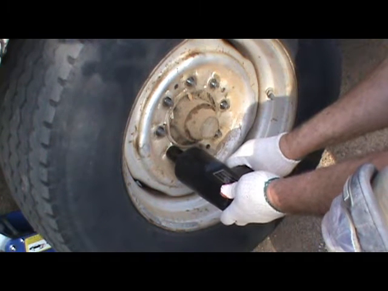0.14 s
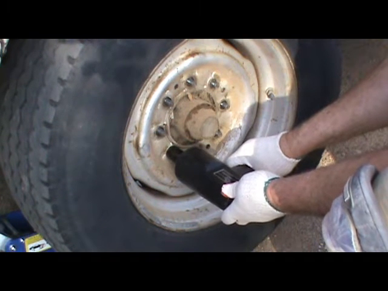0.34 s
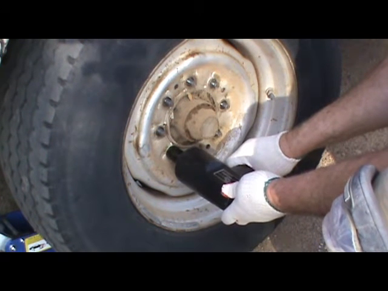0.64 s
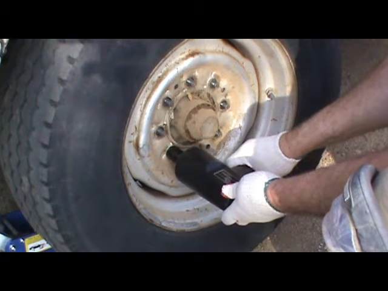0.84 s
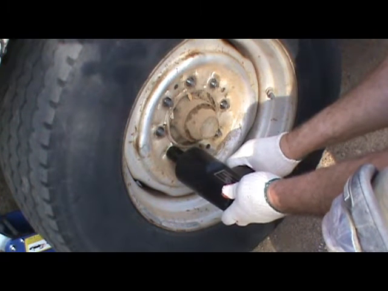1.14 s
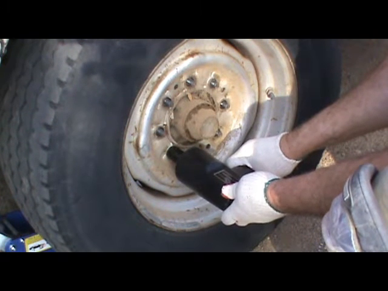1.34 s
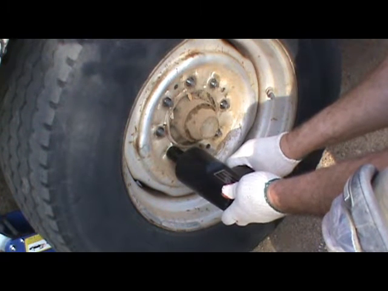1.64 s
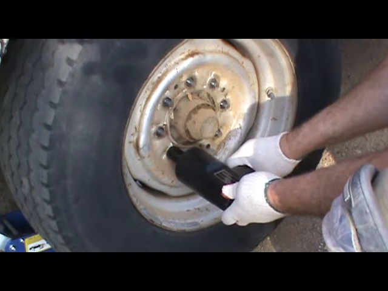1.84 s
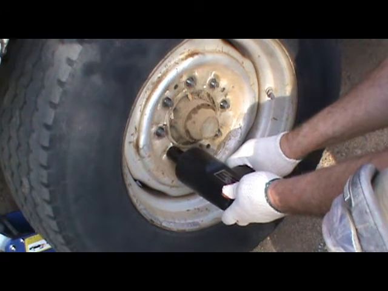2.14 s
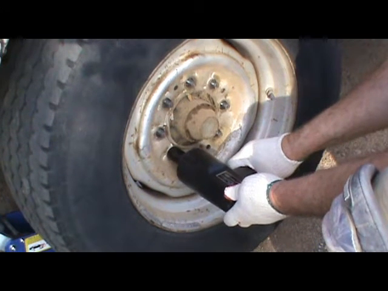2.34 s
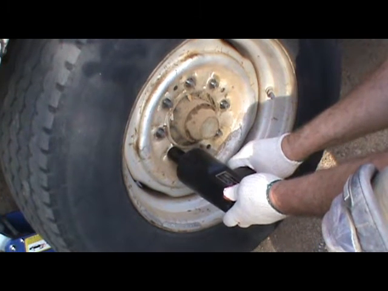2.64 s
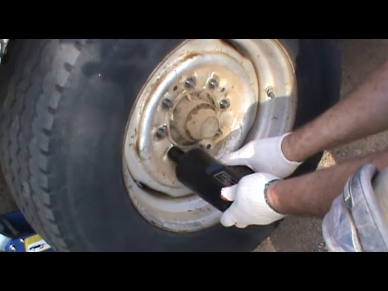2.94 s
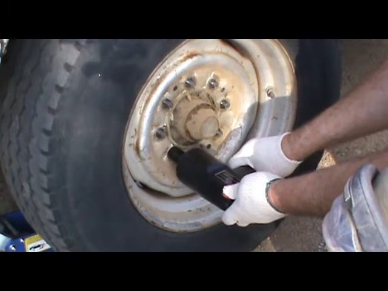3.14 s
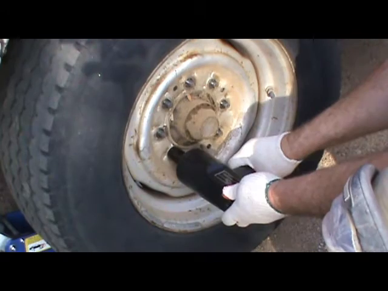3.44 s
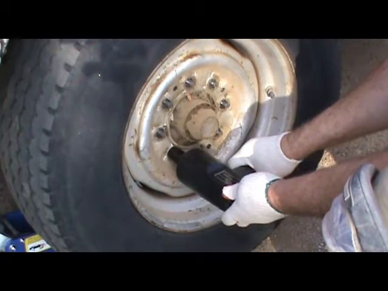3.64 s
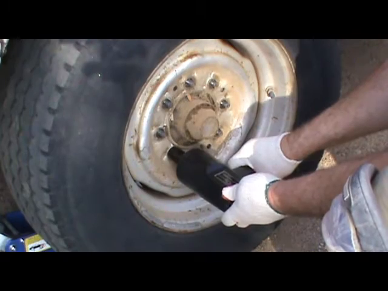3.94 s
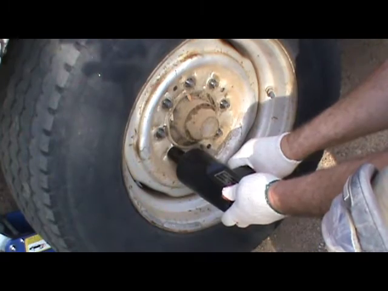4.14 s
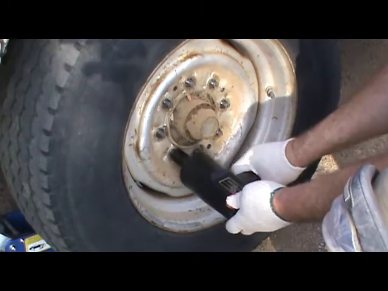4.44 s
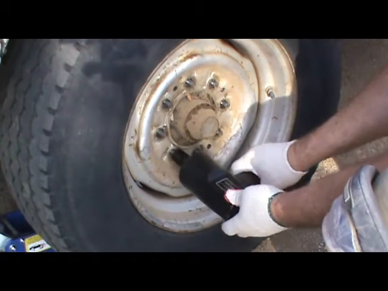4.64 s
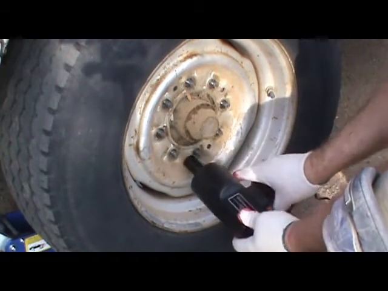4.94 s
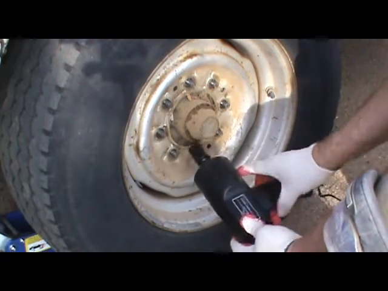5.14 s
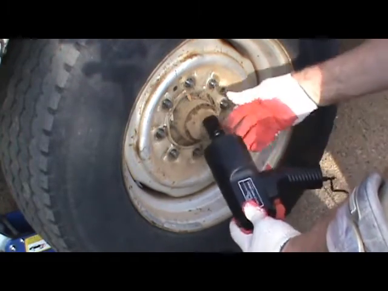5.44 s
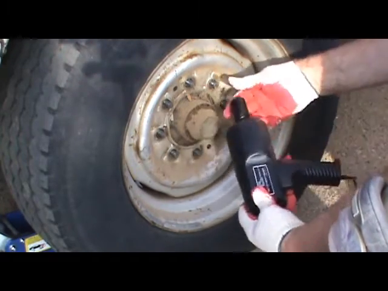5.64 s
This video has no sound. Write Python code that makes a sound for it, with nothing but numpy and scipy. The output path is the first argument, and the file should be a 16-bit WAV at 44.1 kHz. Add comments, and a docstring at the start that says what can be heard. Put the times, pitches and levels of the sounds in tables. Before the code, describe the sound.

A heavy motorised wrench works on a truck wheel nut in open air, heard close in stereo. Three accelerating, rattling whines each end abruptly in a sharp steel crack with wheel ringing. A short pause after the second leaves only fading ring, a low tyre hum, and two clicks. After the third, the motor keeps running, a bright scrape and squeak follow, and loose knocking slows with the tool in the air.

```python
"""A motor already spinning up is heard first, gears whining and clutch rattling: an electric flywheel impact wrench
on a lug nut of a steel truck wheel, close by and outdoors. Three spin-ups end in hammer blows that ring the wheel.
After the second the tool rests and clicks twice; the third frees the nut and the wrench is drawn off, running down.
Impacts excite decaying modes; the rattle is contact noise, and the whine gear-mesh harmonics, both following
the flywheel's speed through the resonances of the housing."""
import sys
import numpy as np
from scipy import signal
from scipy.fft import rfft, irfft
from scipy.io import wavfile
from scipy.ndimage import uniform_filter1d

SR = 44100
rng = np.random.default_rng(int(sys.argv[2]) if len(sys.argv) > 2 else 0)


def inscribe(sig):
    """Save sig as 16-bit PCM at rate SR to the path in sys.argv[1].

    A 1-D sig is mono; a 2-D sig holds one channel per row.
    Samples are clipped to [-1, 1] before scaling.
    """
    pcm = np.round(np.clip(np.atleast_2d(sig).T, -1, 1) * 32767)
    wavfile.write(sys.argv[1], SR, pcm.astype(np.int16))


N = 255780
T = np.arange(N) / SR   # time [s]
HZ = np.maximum(np.arange(N // 2 + 1) * SR / N, 1)   # frequency of each spectral bin [Hz]


def from_db(db):
    """Level: 20 dB is a factor of ten in amplitude."""
    return 10 ** (np.asarray(db) / 20)


def rms_one(x):
    """Normalization: scales a signal to unit root mean square."""
    return x / np.sqrt(np.mean(x ** 2) + 1e-20)


def in_time(rows):
    """Linear interpolation: each column of a curve at every sample."""
    s, *columns = np.transpose(rows)
    return [np.interp(T, s, c) for c in columns]


def over_hz(points):
    """Logarithmic frequency scale: a table interpolated at every bin."""
    hz, value = np.transpose(points)
    return np.interp(np.log(HZ), np.log(hz), value)


def body(slope, peaks=()):
    """Minimum phase: the causal response of a slope with resonances, found by cepstrum; power gain 1."""
    db = over_hz(slope)
    for hz, width, gain_db in peaks:
        db = db + gain_db / (1 + (2 * (HZ - hz) / width) ** 2)
    cepstrum = irfft(np.log(rms_one(from_db(db))), N)
    cepstrum[1:N // 2] *= 2
    cepstrum[N // 2 + 1:] = 0
    return np.exp(rfft(cepstrum))


def through(x, response):
    """Linear filtering: multiplies the spectrum by a response."""
    return irfft(rfft(x) * response, N)


def noise():
    """White noise: independent normal samples."""
    return rng.standard_normal(N)


def band(x, low_hz, high_hz):
    """Band limitation: a Butterworth bandpass."""
    edges = [low_hz, min(high_hz, SR / 2 - 1)]
    return signal.sosfilt(signal.butter(4, edges, "band", fs=SR, output="sos"), x)


def strike(s, t60, rise=.0004):
    """Exponential decay: climbs 20 dB per rise time up to 1 at time s, then falls 60 dB in t60."""
    climb_db = 20 * (T - s) / rise
    decay_db = -60 * (T - s) / t60
    return from_db(np.maximum(np.where(T < s, climb_db, decay_db), -200))


def tail(t60):
    """High modal density: many crowded modes dying away together as noise; power gain 1."""
    decay = noise() * strike(0.00095, t60)
    return rfft(decay) / np.linalg.norm(decay)


def hold(start_s, end_s, edge_s):
    """Gating: an envelope of 1 between two times, with sloping edges inside them."""
    return np.clip(np.minimum(T - start_s, end_s - T) / edge_s, 0, 1)


def linger(energy, t60, build_s=.001):
    """Energy storage: contacts build up and die away in the metal."""
    keep = from_db(-120 / (t60 * SR))   # energy falls by 10^6 in t60
    swell = np.exp(-1 / (build_s * SR))
    return signal.lfilter([1 - swell], [1, -keep - swell, keep * swell], energy + 1e-18)


def scattered(scatter_db):
    """Random excitation: a varying energy for each contact."""
    return from_db(scatter_db * np.clip(noise(), -2, 2)) ** 2


def per_turn(turns, count, scatter_db):
    """Cyclic excitation: contacts come count times a turn, each a little early or late."""
    wobble = rms_one(uniform_filter1d(noise(), size=1500))
    step = np.maximum.accumulate(np.floor(count * (turns + .025 * wobble)))
    return np.diff(step, prepend=step[0]) * scattered(scatter_db)


def loose_parts(per_s, scatter_db):
    """Shot process: contacts come at random."""
    return (rng.random(N) < per_s / SR) * scattered(scatter_db)


# Spectrum of the outdoor air: (frequency [Hz], relative level [dB])
OUTDOOR_SPECTRUM = [(15, -37), (25, -7), (144, -9.5), (209, -2.5), (445, -18), (537, -10), (1300, -18.5),
                    (1660, -21), (1850, -25), (3260, -24.5), (14300, -34.5), (15500, -41)]


def outdoors():
    """Ambient noise: steady noise of fixed spectrum."""
    return from_db(-50.0) * through(noise(), body(OUTDOOR_SPECTRUM))


def breeze():
    """Incoherent noise: each port has its own low rumble."""
    return from_db(-72) * np.array([rms_one(band(noise(), 22, 120)) for port in "LR"])


# Low thumps and buffets; at 2.3 s the tyre and truck thump after the blow:
# (peak time [s], level [dB], 20 dB rise time [s], t60 [s], upper edge [Hz])
LOW_THUMPS = [(1.06, -33.5, 0.022, 0.9, 315), (1.45, -26, 0.072, 0.76, 112), (2.3, -17.5, 0.018, 0.46, 890),
              (2.45, -33.5, 0.075, 1, 487), (4.4, -32, 0.29, 0.78, 273), (5.725, -21.5, 0.03, 0.28, 118)]
# Spectrum of the thumps and buffets before the upper edge: (frequency [Hz], relative level [dB])
THUMP_SPECTRUM = [(15, -49), (25, -21), (275, -4.5), (361, -4.5), (395, -12.5), (533, -12), (730, -15),
                  (786, -12.5), (900, -13), (1170, -49), (1980, -120)]


def thumps():
    """Low-frequency transients: band-limited noise rises and dies as thumps and buffets."""
    lumps = through(noise(), body(THUMP_SPECTRUM))
    out = 0
    for s, db, rise, t60, edge_hz in LOW_THUMPS:
        out = out + from_db(db) * strike(s, t60, rise) * band(lumps, 25, edge_hz)
    return out


TYRE_HZ, TYRE_DB = 201, -52.5   # frequency [Hz], rms level while held [dB]
TYRE_S, TYRE_HOLD_S, TYRE_T60_S = 2.28, .75, 1.7   # start, steady time and decay [s]


def tyre_hum():
    """Cavity resonance: the air in the tyre, set humming by the second blow, holds and then decays."""
    fade_in = np.clip((T - TYRE_S) / .04, 0, 1)
    level_db = TYRE_DB - 60 * np.maximum(T - TYRE_S - TYRE_HOLD_S, 0) / TYRE_T60_S
    return fade_in * from_db(level_db) * np.sqrt(2) * np.sin(2 * np.pi * TYRE_HZ * T)


# Clutch and trigger contacts, in two groups: (time [s], level [dB], t60 [s])
LATCH_CONTACTS = [(2.826, -32.5, 0.039), (2.8472, -28.5, 0.12), (2.852, -18, 0.022), (2.992, -27.5, 0.12),
                  (2.9947, -14.5, 0.025)]
# Spectrum of a contact: (frequency [Hz], relative level [dB])
LATCH_SPECTRUM = [(88, -33), (150, -16), (314, -5.5), (404, -3), (1200, -3.5), (1340, -0.5), (1830, -3.5),
                  (3830, -6), (4140, -11), (4930, -3.5), (6470, -14), (10900, -9.5), (15500, -42)]


def latch():
    """Impulsive excitation: the clutch falling back and the trigger click and ring briefly in the case."""
    envelope = sum(from_db(db) * strike(s, t60, rise=0.0022) for s, db, t60 in LATCH_CONTACTS)
    return through(envelope * noise(), body(LATCH_SPECTRUM) * (1 + 0.21 * tail(t60=0.022)))


SCRAPE_FROM_S, SCRAPE_TO_S, SCRAPE_EDGE_S = 4.45, 4.77, 0.031   # start, end and fading edges [s]
SCRAPE_DB = -29.5   # level of the unit-rms grit inside the gate [dB]


def scrape():
    """Sliding friction: the socket leaves the nut in dense random contacts, bright and gritty."""
    grit = np.sqrt(linger(loose_parts(per_s=380, scatter_db=4.0), t60=.02)) * noise()
    gate = hold(SCRAPE_FROM_S, SCRAPE_TO_S, SCRAPE_EDGE_S)
    return from_db(SCRAPE_DB) * gate * rms_one(band(grit, 7600, 10400))


# Nut and socket squeals: (peak time [s], frequency [Hz], level [dB], 20 dB rise time [s], t60 [s])
SQUEAL_TONES = [(1.047, 8898, -19, .02, .11), (1.05, 4032, -26, .02, .16), (1.04, 5184, -31, .01, .18),
                (2.29, 8898, -27, .015, .14), (4.664, 5950, -14, .004, .03)]


def squeals():
    """Friction-induced vibration: steel slipping on steel gives short pure tones."""
    out = 0
    for s, hz, db, rise, t60 in SQUEAL_TONES:
        out = out + from_db(db) * strike(s, t60, rise) * np.sin(2 * np.pi * hz * T)
    return out


# Modes of the steel wheel: (frequency [Hz], t60 [s], relative level at the first blow [dB],
# relative level at the later blows [dB])
WHEEL_MODES = [(531, 1.2, -42, -32), (554, .3, -27, -36), (807, 1.2, -42, -38), (1066, 1.3, -44, -44),
               (1707, 1.8, -33, -45), (1814, .64, -37, -38), (2148, .6, -22, -38), (2272, .35, -23, -30),
               (2422, .75, -37, -31), (2616, 1.0, -47, -44), (2840, .5, -31, -45), (2902, .83, -45, -40),
               (3160, 1.4, -52, -44), (3198, .9, -41, -37), (3311, .75, -29, -38), (3892, 1.1, -41, -46),
               (4274, .7, -45, -41), (4689, .35, -23, -38), (5044, .65, -36, -36), (8053, .25, -42, -44)]


def ring(s, mix):
    """Modal superposition: decaying wheel modes, their levels mixed between first and later blows."""
    out, start = np.zeros(N), int(s * SR)
    age = T[:N - start]
    phases = rng.uniform(-np.pi, np.pi, len(WHEEL_MODES))
    for (hz, t60, first_db, later_db), phase in zip(WHEEL_MODES, phases):
        struck_db = np.interp(mix, [0, 1], [first_db, later_db])
        db = struck_db - np.minimum(60 * age / t60, 200)
        out[start:] += from_db(db) * np.sin(2 * np.pi * hz * age + phase)
    return out * np.clip((T - s) / 0.0027, 0, 1)   # soft onset


# Hammer blows, the first a double strike: (time [s], crack level [dB], crack t60 [s],
# wash level before its gain [dB], gain on the wheel modes [dB], mix of the mode levels [0 first, 1 later])
HAMMER_BLOWS = [(1.005, -9, 0.035, -60, -32, 0.15), (1.016, -14, 0.27, -30, 3, 0.26),
                (2.266, -10, 0.21, -31.5, -0.5, 0.88), (4.219, -10.5, 0.14, -33, -2, 0.89)]
# Spectrum of crack and wash: (frequency [Hz], relative level [dB])
CRACK_SPECTRUM = [(59, -37), (100, -15), (447, -7.5), (742, -4.5), (956, 4), (1230, -5), (2270, -2.5),
                  (2990, -7), (4560, -2), (6950, -12.5), (9150, -4), (10400, -9), (12000, -12),
                  (14200, -25), (15500, -30)]


def hammer():
    """Impact: each blow cracks, leaves a duller wash in the rim and excites the wheel modes."""
    crack = wash = rings = 0
    for s, crack_db, t60, wash_db, ring_db, mix in HAMMER_BLOWS:
        crack = crack + from_db(crack_db) * strike(s, t60)
        wash = wash + from_db(wash_db) * strike(s, t60=0.53)
        rings = rings + from_db(ring_db) * ring(s, mix)
    colour = body(CRACK_SPECTRUM)
    crack_sound = through(crack * noise(), colour)
    wash_sound = band(through(wash * noise(), colour), 300, 7400)
    return crack_sound + from_db(8.5) * wash_sound + rings


# Spin-ups of the motor: (motor start [s], hammer drops in [s])
SPIN_UPS = [(-.146, 1.003), (1.052, 2.262), (3.013, 4.213)]
# Flywheel speed once the nut has let go: (time [s], speed [turns/s])
LOOSE_SPEED = [(4.22, 45), (4.26, 45), (4.43, 40), (4.55, 43.3), (4.8, 44.7), (5.8, 30)]
NUT_LOOSE_S = LOOSE_SPEED[0][0]
TOP_SPEED, SPIN_UP_S = 74.4, .86   # limit of the speed [turns/s], time constant [s]
STALL_S = .007   # a blow stops the flywheel in this time [s]


def flywheel():
    """Rotational inertia: speed nears its limit exponentially, stalls at a blow, and runs on once the nut is loose."""
    speed = in_time(LOOSE_SPEED)[0] * np.clip((T - NUT_LOOSE_S) / STALL_S, 0, 1)
    for start_s, blow_s in SPIN_UPS:
        spin_up = 1 - np.exp(-np.maximum(T - start_s, 0) / SPIN_UP_S)
        speed = speed + TOP_SPEED * spin_up * hold(start_s, blow_s + STALL_S, STALL_S)
    return speed


WORKING_SPEED = 50   # reference for the levels [turns/s]
PICKUP_SPEED = 6   # slower than this the works hardly rattle [turns/s]


def with_speed(speed, doubling_db):
    """Power law: gain grows by so many dB per doubling of speed and vanishes at a crawl."""
    gain = from_db(doubling_db * np.log2(speed / WORKING_SPEED + 1e-9))
    return gain * speed ** 2 / (speed ** 2 + PICKUP_SPEED ** 2)


# Gear growl, clutch clatter and metal chatter, before the layer trims: (level at working speed [dB],
# rise on the nut [dB per doubling of speed], change with the nut loose [dB], change off the nut [dB])
RATTLE_LEVELS = [(-20.9, 2.6, -2, -.1), (-20, 6.4, -1.2, -.6), (-27.8, 7.9, -3.8, 1.9)]
# Dips and swells of the growl as the wrench is drawn off: (time [s], change [dB], half width to 1/e [s])
GROWL_SWELLS = [(4.6, -6, 0.033), (4.75, 2.4, .05), (5.19, 4, 0.036)]
FREE_FOLLOWS = .6   # off the nut the rattle's dB follow the speed by only this share


def running_levels(speed, seated):
    """Load dependence: growl, clatter and chatter shift balance with speed and load, brighter when fast."""
    loose = T > NUT_LOOSE_S
    follows = seated + FREE_FOLLOWS * (1 - seated)
    gains = []
    for db, doubling_db, loose_db, free_db in RATTLE_LEVELS:
        load_db = db + loose_db * loose + free_db * (1 - seated)
        gains.append(from_db(load_db) * with_speed(speed, doubling_db * follows))
    growl, clatter, chatter = gains
    swell_db = sum(db * np.exp(-((T - s) / width) ** 2) for s, db, width in GROWL_SWELLS)
    return growl * from_db(swell_db), clatter, chatter


def rattle(contacts, t60, turn_share, jaw_share, loose_share):
    """Amplitude-modulated noise: flywheel, jaw and loose-part bursts over steady rubbing; rms 1."""
    energy = 1   # the rubbing
    for hits, share in zip(contacts, (turn_share, jaw_share, loose_share)):
        ringing = linger(hits * scattered(2), t60)   # each contact varies anew in every layer
        energy = energy + share * ringing / ringing.mean()
    return rms_one(np.sqrt(energy) * noise())


def gears(turns, housing):
    """Gear mesh: 26 uneven teeth a turn give a harmonic whine, swelling as it crosses a resonance; rms 1."""
    mesh = 2 * np.pi * 26 * turns + .2 * rms_one(uniform_filter1d(noise(), size=700))
    tone = np.sin(mesh) + from_db(-2) * np.sin(2 * mesh) + from_db(-5) * np.sin(3 * mesh)
    once_a_turn = 1 + .35 * np.cos(2 * np.pi * turns)
    return rms_one(through(tone * once_a_turn, housing))


SING_HZ, SING_WIDTH_HZ = 2190, 42   # mode of the free socket: frequency and width [Hz]


def singing():
    """Narrow resonance: noise drives one mode of the free socket; rms 1."""
    return rms_one(through(noise(), 1 / (1 + 2j * (HZ - SING_HZ) / SING_WIDTH_HZ) ** 2))


# Individually timed knocks of the loose socket: (time [s], level before the layer gains [dB],
# treble against that level [dB])
TIMED_KNOCKS = [(0.3336, -7, -4), (0.367, -6.5, 3), (1.496, -13, 1), (3.3288, -9.5, 6), (3.5982, 0.5, -4),
                (4.3102, -1, -1), (4.3311, -1, 0), (4.354, 2, 0), (4.3778, -1, -1), (4.4257, 4, -11),
                (5.0753, 4, -11), (5.2829, 3.5, -11), (5.375, 2, 1.5), (5.492, 3, -1), (5.5902, -10, 13),
                (5.6121, 2, -7), (5.6546, -5, 9), (5.7192, -10, 10)]
STRAY_SEATED_CHANCE, STRAY_FREE_CHANCE = .2, .5   # stray knocks on the nut and off it [chance per turn]
# Strays at working speed, before the layer gains: level [dB], rise [dB per doubling], spread and treble [dB]
STRAY_DB, STRAY_DOUBLING_DB, STRAY_SPREAD_DB, STRAY_TREBLE_DB = -8.5, 1, 1.8, 3.5


def knocks(housing, turns, speed, seated):
    """Backlash: the socket knocks on its square drive, oftener when free, as a thud with a bright edge."""
    chance = STRAY_SEATED_CHANCE * seated + STRAY_FREE_CHANCE * (1 - seated)
    strays = per_turn(turns, count=1, scatter_db=STRAY_SPREAD_DB) * (rng.random(N) < chance)
    dull = strays * (from_db(STRAY_DB) * with_speed(speed, STRAY_DOUBLING_DB)) ** 2
    bright = dull * from_db(STRAY_TREBLE_DB) ** 2
    for s, db, treble_db in TIMED_KNOCKS:
        dull[int(s * SR)] = from_db(db) ** 2
        bright[int(s * SR)] = from_db(db + treble_db) ** 2
    thud = through(np.sqrt(linger(dull, t60=0.011)) * noise(), housing)
    edge = band(np.sqrt(linger(bright, t60=0.012)) * noise(), 3100, 10900)
    return from_db(-10.0) * thud + from_db(-12) * edge


# Socket on the nut: (time [s], share seated [0-1])
SOCKET_SEATING = [(4.52, 1), (4.8, 0.02)]
# Broad response of the wrench on the nut, and held free: (frequency [Hz], relative level [dB])
SEATED_SLOPE = [(100, -21), (200, -11.5), (350, -0.5), (800, 0.5), (1600, -5.5), (3000, 1), (5000, -7.5),
                (7000, -12.5), (11000, -2), (15300, -17)]
FREE_SLOPE = [(100, -27.5), (200, -22.5), (350, -7.5), (800, -5), (1600, -4), (3000, 5), (5000, 1),
              (7000, -10.5), (11000, -16), (15300, -25)]
# Resonances added to each: (frequency [Hz], width [Hz], height [dB])
SEATED_RESONANCES = [(423, 48, 4), (590, 125, 5.1), (991, 132, 11.2), (1109, 28, 11.5), (1291, 310, 8.6),
                     (1450, 208, 12.1), (1852, 270, 8.3), (2120, 300, 5), (2422, 410, 6.3), (2940, 66, 3.7),
                     (3400, 340, 4.2), (3890, 400, 4.3), (4360, 480, 7.5), (4730, 330, 8.1),
                     (5690, 730, 7.6), (7710, 1570, 9.3), (8910, 360, 7.1), (9400, 630, 7.6),
                     (11300, 751, 6.2), (12300, 380, 5.9), (13712, 287, 3.6)]
FREE_RESONANCES = [(420, 150, 2.7), (1040, 165, 13.2), (1330, 165, 8.6), (1820, 250, 6.1), (2156, 260, 7.9),
                   (2214, 36, 5.1), (2390, 540, 3.4), (3730, 430, 4.2), (4480, 570, 6.9), (5900, 390, 5.9),
                   (7560, 840, 4.3), (9100, 1200, 3.3), (10630, 650, 3.6)]


def wrench():
    """Source and filter: whine and rattle of the works, coloured by the housing and what it touches."""
    speed = flywheel()
    seated = np.clip(in_time(SOCKET_SEATING)[0], 0, 1)
    turns = np.cumsum(speed) / SR
    flywheel_hits = per_turn(turns, count=1, scatter_db=1.0)
    # the three jaws clatter most when unloaded
    jaw_hits = per_turn(turns, count=3, scatter_db=3.5) * (1 - 0.8 * seated)
    contacts = flywheel_hits, jaw_hits, loose_parts(per_s=520, scatter_db=0.5)
    growl, clatter, chatter = running_levels(speed, seated)

    crowded = 1 + tail(t60=.07) * np.interp(HZ, [1500, 6000], [.15, .35])
    on_nut = body(SEATED_SLOPE, SEATED_RESONANCES) * crowded
    in_air = body(FREE_SLOPE, FREE_RESONANCES) * crowded

    low = band(rattle(contacts, t60=0.025, turn_share=0.14, jaw_share=0.63, loose_share=2.2), 89, 1720)
    middle = band(rattle(contacts, t60=0.023, turn_share=0.58, jaw_share=1.25, loose_share=1.6), 1720, 6820)
    high = band(rattle(contacts, t60=0.032, turn_share=2.8, jaw_share=1.0, loose_share=1.7), 7140, 20300)
    layers = [(growl * from_db(0.15), low), (clatter * from_db(-.5), middle), (chatter * from_db(-0.6), high)]
    out = 0
    for gain, x in layers:
        nut_sound = np.sqrt(seated) * rms_one(through(x, on_nut))
        free_sound = np.sqrt(1 - seated) * rms_one(through(x, in_air))
        out = out + gain * (nut_sound + free_sound)

    whine_gain = growl * from_db(-5.5 - 8 * (1 - seated)) * np.minimum(speed / 44, 1)
    whine = whine_gain * gears(turns, on_nut)
    song = clatter * from_db(-8) * (1 - seated) * singing()
    return out + whine + song + knocks(in_air, turns, speed, seated)


# Phase lead of the left port over the right: (frequency [Hz], lead [rad])
LEFT_LEAD = [(60, .6), (200, .85), (430, 1.05), (1200, .9), (1800, .5), (2800, .25), (5500, .3),
             (7500, .03), (15000, 0)]
# Level of the left port over the right: (frequency [Hz], difference [dB])
LEFT_BALANCE = [(60, .5), (250, 2.4), (600, 2.1), (1300, 3), (2200, 1.7), (4400, .8), (15000, 0)]
# Wandering side signal: (frequency [Hz], gain [dB])
SIDE_GAIN = [(100, -19), (600, -17), (1300, -13.5), (4500, -12), (8000, -15), (13000, -33)]


def microphones(x, wandering):
    """Interaural differences: left hears first and louder; contacts at different spots move the image."""
    lean = from_db(over_hz(LEFT_BALANCE) / 2) * np.exp(.5j * over_hz(LEFT_LEAD))   # half to each port
    spot = rms_one(uniform_filter1d(noise(), size=300))
    side = through(wandering * spot, from_db(over_hz(SIDE_GAIN)))
    return np.array([through(x, lean) + side, through(x, 1 / lean) - side])


def scene():
    """Superposition: all sources add at the microphone pair, and the tool's image wanders."""
    tool = from_db(.5) * wrench() + hammer() + scrape() + latch()
    surroundings = squeals() + thumps() + tyre_hum() + outdoors()
    return microphones(tool + surroundings, tool) + breeze()


CUTOFF_HZ = 15700   # upper limit of the sound [Hz]


def record(dry):
    """Saturation and band limitation: peaks are rounded, then the top is cut."""
    top = 0.88
    rounded = top * np.tanh(dry / top)
    return signal.sosfilt(signal.ellip(10, .2, 80, CUTOFF_HZ, fs=SR, output="sos"), rounded)


dry = scene()
out = record(dry)
inscribe(out)
```